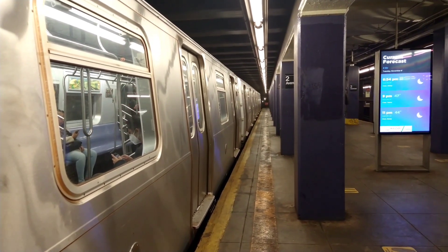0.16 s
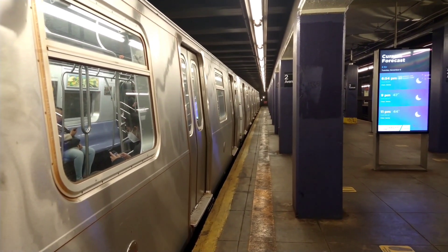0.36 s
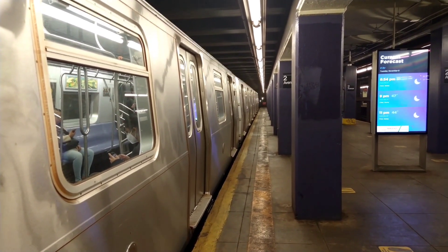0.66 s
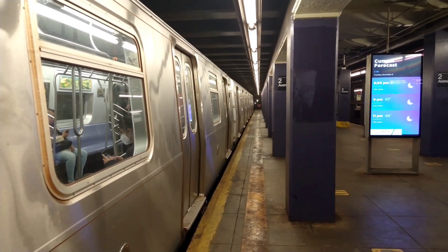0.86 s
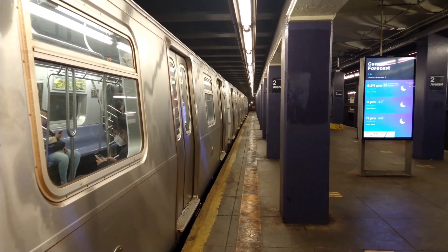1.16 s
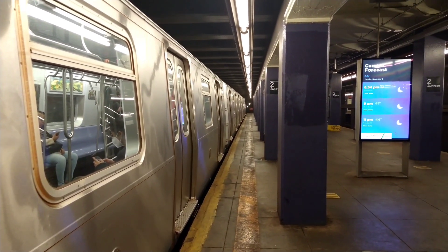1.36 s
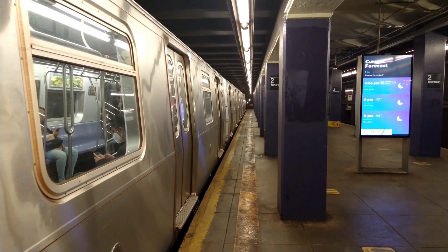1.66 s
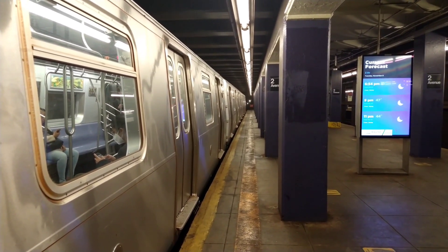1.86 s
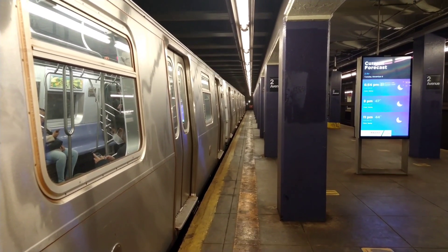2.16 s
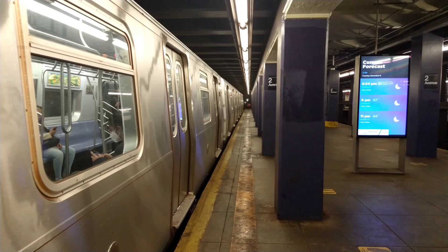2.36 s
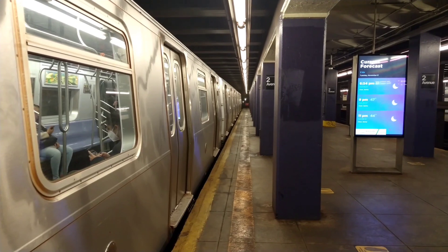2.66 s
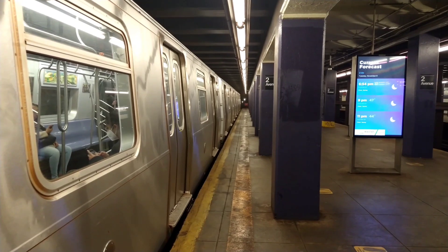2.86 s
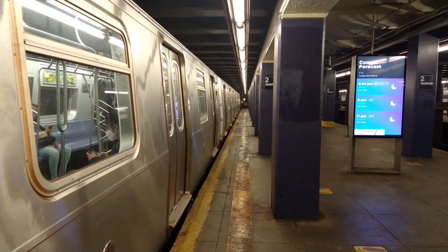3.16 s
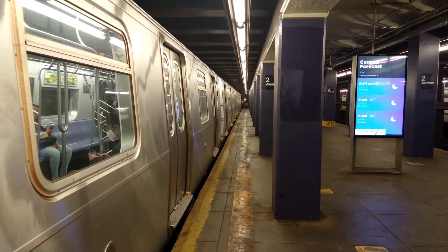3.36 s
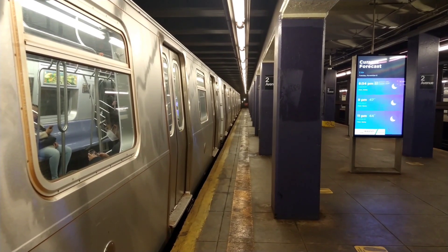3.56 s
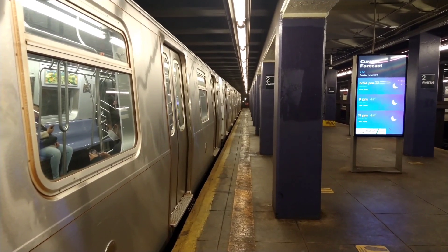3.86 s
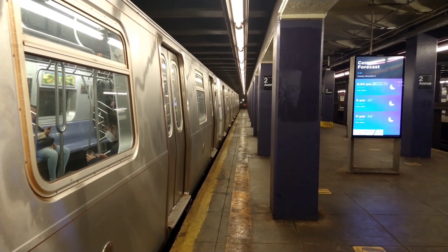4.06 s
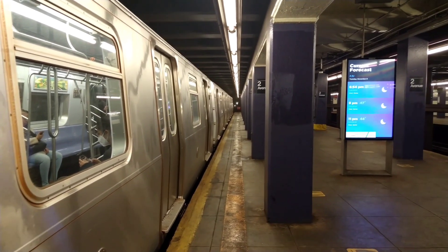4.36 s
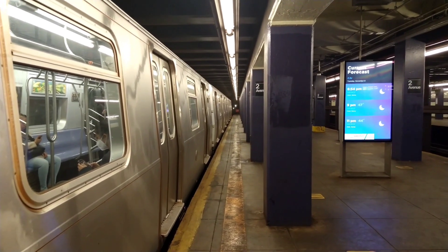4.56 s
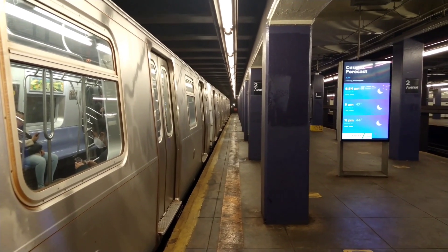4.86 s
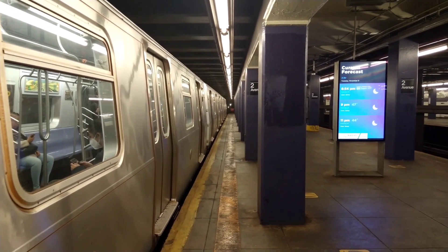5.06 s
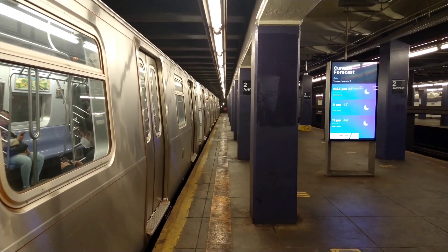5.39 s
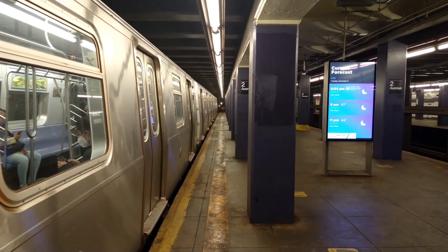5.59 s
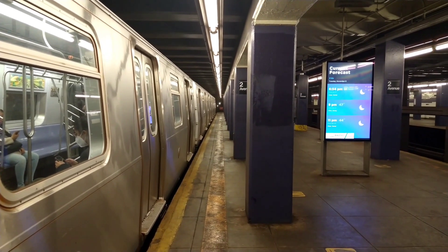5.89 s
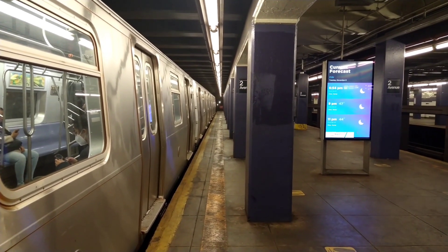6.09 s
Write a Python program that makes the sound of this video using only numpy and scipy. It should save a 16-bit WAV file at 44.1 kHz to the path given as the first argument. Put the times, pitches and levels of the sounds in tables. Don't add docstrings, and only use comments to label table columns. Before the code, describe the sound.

Low pulsing fan hum of a parked train under a faint electrical whine, ending in dull knocks and a long bright rush of air.

```python
import sys
import numpy as np
from scipy import signal
from scipy.fft import rfft, irfft
from scipy.io import wavfile
from scipy.ndimage import uniform_filter1d

SR = 44100
rng = np.random.default_rng(int(sys.argv[2]) if len(sys.argv) > 2 else 0)


def boost(x):
    u = np.asarray(x, float) / 20
    return 10 ** u


def waveform_to_disk(signal):
    frames = np.transpose(np.atleast_2d(signal))
    scaled = np.clip(frames, -1, 1) * 32767
    samples = np.round(scaled).astype(np.int16)
    wavfile.write(sys.argv[1], SR, samples)


N = 274743
T = np.arange(N) / SR
HZ = np.fft.rfftfreq(N, 1 / SR) + 1

# frequency in Hz, side minus mid in dB.
WIDTH = [(70, -23), (110, -17), (180, -10.5), (320, -13), (570, -6), (990, -1), (1740, 2.5), (3060, -1),
         (5360, 1.5), (9400, -0.5)]


def curve(table):
    s, *columns = np.transpose(table)
    return [np.interp(T, s, c) for c in columns]


def colour(points):
    hz, db = np.transpose(points)
    return np.interp(np.log(HZ), np.log(hz), db)


def walk(rate):
    hold = int(SR / rate)
    levels = np.repeat(rng.standard_normal(N // hold + 1), hold)
    return 1.26 * uniform_filter1d(uniform_filter1d(levels, hold), hold)[:N]


def ramp(start_s, length_s):
    return np.clip((T - start_s) / length_s, 0, 1)


def diffuse(shape_db, lean, lo, hi, flicker_db, moves):
    mid, side = rfft(rng.standard_normal((2, N)), axis=1) * boost(shape_db)
    in_band = (HZ > lo) & (HZ < hi)
    rms = np.sqrt(2 * np.sum(boost(2 * shape_db)[in_band]) / N)
    mid, side = mid / rms, side / rms * boost(colour(WIDTH))
    lean_db = np.outer([.5, -.5], colour(lean) * (HZ > 150))
    ears = np.array([mid + side, mid - side]) * boost(lean_db)
    out = 0
    for step in range(21):
        place = np.clip(2 * np.log2(HZ / 20) - step, -1, 1)
        band = irfft(ears * np.cos(np.pi / 2 * place) ** 2, N)
        out = out + band * boost(flicker_db * walk(6) + moves(20 * 2 ** (step / 2)))
    return out


def fans():
    # slip in Hz, tone in dB, tone in step at s, octave in dB, octave in step at s.
    each_fan = [(-3.087, -25.8, -0.0152, -42.0, 0.0513), (-3.835, -51.1, 0.0555, -51.9, -0.0328),
                (-3.502, -42.9, 0.0784, -44.5, -0.0303), (-3.344, -48.9, -0.0607, -45.1, -0.0674),
                (-3.207, -34.2, -0.1396, -48.2, -0.0218), (-2.881, -37.2, -0.1378, -53.9, -0.0786),
                (-2.69, -40.0, 0.0894, -45.2, -0.0779), (-2.602, -31.7, -0.0228, -40.7, 0.0339),
                (-2.232, -54.8, -0.1513, -56.4, 0.109), (-3.044, -34.1, -0.1482, -36.2, -0.022),
                (-4.944, -48.3, 0.0445, -42.8, 0.0323), (-3.723, -43.6, -0.0523, -38.0, -0.0543)]
    # level in dB, in step at s.
    third_tones = [(-34.5, -0.0227), (-55.9, 0.0168), (-65.4, 0.0126), (-63.5, 0.0351), (-65.9, 0.0451),
                   (-59.0, -0.0574), (-51.0, -0.0144), (-47.8, 0.0424), (-66.8, -0.0042), (-49.6, 0.0241),
                   (-51.4, -0.0291), (-51.8, -0.0261)]
    off_axis_db = [-17, -11.5, -22.5, -20.5, -24, -26.5, -29, -26, -17.5, -12, -22, -17.5]
    # multiple of the blade pitch, level in dB.
    upper_tones = [(3, -50.5), (4, -54.5), (5, -51.5), (6, -57.5), (7, -62.5), (8, -63), (9, -62.5),
                   (10, -59.5), (11, -62), (12, -63.5)]
    # time in seconds, change of the blade
    # tone in dB.
    tone_swing = [(0, 2), (.2, -1.5), (.42, -3), (.7, -1.5), (1.1, 2.5), (1.5, 0), (2.2, 1), (2.9, -0.5),
                  (3.2, 1.5), (3.6, -3), (4.3, 0), (5.1, -2), (5.7, -0.5), (6.23, 1.5)]
    unloaded_hz, blade_hz = 117, 113.8
    side_lag_s = .0022
    octave_trim_db, third_trim_db = 0.5, -0.3
    arriving = 3
    first_arriving = len(each_fan) - arriving

    arrival = ramp(4.6, 0.88)
    run_down = np.exp(-T / .11)
    running = [run_down] + [1] * (first_arriving - 1) + [arrival] * arriving
    swing_db = curve(tone_swing)[0]
    mid = side = 0
    for i, (slip, db, s, octave_db, octave_s) in enumerate(each_fan):
        third_db, third_s = third_tones[i]
        tones = [(db + swing_db, s), (octave_db + octave_trim_db, octave_s), (third_db + third_trim_db, third_s)]
        if i == first_arriving:
            tones.append((-40, s))
        wobble = 0.087 * walk(5.27)
        for k, (tone_db, in_step) in enumerate(tones, 1):
            phase = k * (2 * np.pi * (unloaded_hz * T + slip * (T - in_step)) + wobble)
            late = phase - k * 2 * np.pi * unloaded_hz * side_lag_s
            mid = mid + running[i] * boost(tone_db) * np.cos(phase)
            side = side + running[i] * boost(tone_db + off_axis_db[i]) * k ** .5 * np.cos(late)

    turn = 2 * np.pi * blade_hz * T
    width_hz, width_db = np.transpose(WIDTH)
    for k, base_db in upper_tones:
        db = base_db + 3.5 * arrival
        side_db = db + np.interp(k * blade_hz, width_hz, width_db)
        mid = mid + boost(db + 3 * walk(14)) * np.sin(k * turn + .4 * k * walk(9))
        side = side + boost(side_db + 4 * walk(8)) * np.sin(k * turn + .4 * k * walk(7))
    return np.sqrt(2) * np.array([mid + side, mid - side])


def brake_air():
    # frequency in Hz, density in dB per Hz.
    jet_shape = [(1300, -27.5), (2220, -2), (3140, 2.5), (3650, 2), (4520, -6), (5400, -4.5), (6100, -7.5),
                 (7190, -8), (8000, -11.5), (9000, -18.5), (10000, -24.5), (12500, -34), (14300, -44.5),
                 (15200, -46)]
    # frequency in Hz, width in Hz, level in dB (all ring alike here).
    pipes = [(3200, 60, 0), (3500, 90, -4), (3710, 90, -4), (5430, 140, -8), (6140, 77, -10),
             (6930, 380, -11), (7140, 110, -11)]
    # frequency in Hz, density in dB per Hz.
    pit_shape = [(150, 3), (260, 3.5), (450, 2), (700, -8), (1100, -5), (1500, -9), (2200, -10.5)]
    # frequency in Hz, left minus right in dB.
    lean_air = [(110, 1), (320, -4.5), (990, -0.5), (1740, 0), (3060, -4.5), (5360, -2), (9400, -1)]
    leaks_s, opens_s, opening_s = 4.1, 4.561, 0.074
    leak_db, flow_db, creep_db_per_s = -61, -40, 1.22

    since = np.clip(T - opens_s, 0, None)
    valve = (1 + np.tanh((T - opens_s) / opening_s / 2)) / 2
    jet_db = leak_db + (flow_db - leak_db) * valve + creep_db_per_s * since
    roar_db = -42 + 0.47 * (jet_db - flow_db)
    top_shut = (1 - np.tanh((T - opens_s - 0.18) / 0.073)) / 2
    bright_db = -6 * np.exp(-since / .5) + 3 - 5.5 * top_shut

    def brighten(hz):
        return bright_db * np.clip((hz - 3800) / 2500, 0, 1)

    pipes_db = sum(1.9 / (1 + (2 * (HZ - hz) / width) ** 2) for hz, width, _ in pipes)
    jet = diffuse(colour(jet_shape) + pipes_db, lean_air, 2200, 5000, 0.51, brighten)
    roar_shape = colour([(60, -61)] + pit_shape + [(5000, -55.0)])
    roar = diffuse(roar_shape, lean_air, 700, 1470, 1.3, lambda hz: 0)
    return ramp(leaks_s, 0.18) * (boost(jet_db) * jet + boost(roar_db) * roar)


def whistle():
    # time in seconds, level in dB.
    swelling = [
        (5.0, -75),
        (5.25, -59),
        (5.5, -63),
        (5.75, -54),
        (6.0, -52.5),
        (6.23, -54),
    ]
    tone = [boost(5 * walk(20)) * np.sin(2 * np.pi * 3232 * T + 1.4 * walk(20)) for _ in range(2)]
    return 2 * boost(curve(swelling)[0]) * (T > swelling[0][0]) * np.array(tone)


def leak_tone():
    tone = boost(-72 + 2.5 * walk(15)) * np.exp(2j * np.pi * 5418 * T + .7j * walk(15))
    return ramp(4.1, .08) * np.array([tone.real + .5 * tone.imag, tone.real - .5 * tone.imag])


def thuds():
    # start in seconds, level in dB, pitch in Hz, decay by 60 dB in seconds.
    blows = [
        (.36, -82, 9850, .3),
        (4.2, -43, 400, .5),
        (4.235, -45, 440, .5),
        (4.29, -43, 425, .5),
        (4.335, -41, 424, .5),
        (4.37, -38, 420, .5),
        (4.465, -40, 424, .5),
        (4.67, -35, 222, .7),
        (4.72, -41, 345, .5),
        (4.98, -40, 340, .7),
    ]
    out = np.zeros((2, N))
    for s, db, hz, t60 in blows:
        age = np.clip(T - s, 0, None)
        shape = (1 - np.exp(-age / 0.0075)) * np.exp(-np.log(1000) * age / t60)
        for detune, lag in rng.standard_normal((3, 2)):
            ear_lag = 0.36 * lag * np.array([[1], [-1]])
            out += boost(db) * shape * np.sin(2 * np.pi * hz * (1 + 0.01 * detune) * age + ear_lag)
    return out


def inverter():
    # frequency in Hz, level in dB.
    whine = [(4500, -71.5), (5418, -86), (6750, -81.5), (8878, -91.5), (9000, -79), (9060, -97),
             (11250, -103), (13500, -95)]
    # time in seconds, change of the low tones in dB, of the high tones in dB.
    load = [
        (0, 3.5, -6),
        (.5, 2, -1),
        (1, 0.5, -0.5),
        (1.6, 0.5, 3),
        (2.2, 1, 0.5),
        (3.2, 5, 0),
        (4, 6.5, -6),
        (4.4, 4, -13),
        (6.23, -1, -11),
    ]
    low_db, high_db = curve(load)
    out = 0
    for hz, db in whine:
        lag = np.array([[0], [1]]) * (1.7 + 0.32 * walk(1.0))
        level_db = db + (low_db if hz < 8000 else high_db) + 1.0 * walk(9)
        out = out + boost(level_db) * np.sin(2 * np.pi * hz * T + .5 * walk(2.4) + lag)
    return np.sqrt(2) * out


def pump():
    tone = boost(-47 + 0.62 * walk(3)) * np.exp(2j * np.pi * 353.4 * T + .3j * walk(4))
    aside = boost(-11.5) * tone.imag
    return np.sqrt(2) * np.array([tone.real + aside, tone.real - aside])


def vault():
    # frequency in Hz, density in dB per Hz.
    air_shape = [(25, -31.5), (59, -12), (110, -7.5), (170, -7.5), (276, -9.5), (400, -12), (731, -22),
                 (1300, -24), (2890, -30.5), (3700, -37), (4500, -45), (6940, -50.5), (8800, -63.5),
                 (11000, -90)]
    # frequency in Hz, left minus right in dB.
    lean = [(60, 5.5), (180, -2), (570, -2.5), (990, 1), (1740, -2), (3060, -4.5), (5360, -2.5),
            (9400, -4.5)]
    # centre in seconds, width in seconds, swell in dB.
    swells = [
        (.2, 0.1, 4),
        (2.55, .3, 2.5),
        (3.0, 1.1, 3.5),
        (3.25, 0.14, 2.5),
        (6.0, 1.1, 5.5),
    ]
    swell_db = -3 + sum(db * np.exp(-((T - s) / width) ** 2) for s, width, db in swells)

    def bass_swell(hz):
        return swell_db * np.clip(1.3 - hz / 300, 0, 1)

    return boost(-44) * diffuse(colour(air_shape), lean, 665, 15000, 0.35, bass_swell)


def scene():
    return fans() + brake_air() + whistle() + leak_tone() + thuds() + inverter() + pump() + vault()


def roll_off(x):
    return signal.sosfilt(signal.butter(12, 15140, fs=SR, output="sos"), x)


def record(dry):
    hiss = rng.standard_normal(dry.shape)
    mix = dry + boost(-76.5) * (hiss + .3 * np.roll(hiss, 1, axis=1))
    return roll_off(mix)


dry = scene()
out = record(dry)
waveform_to_disk(out)
```